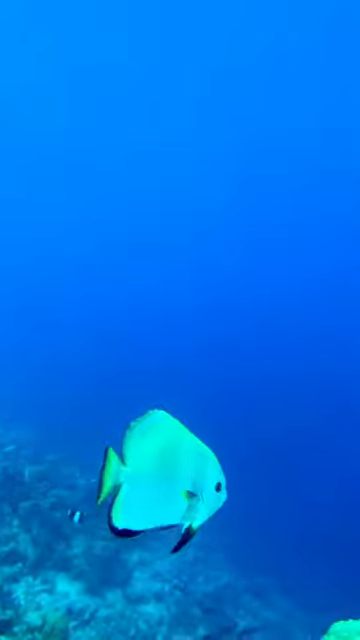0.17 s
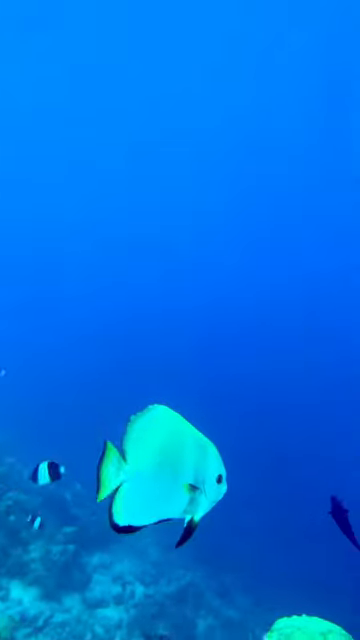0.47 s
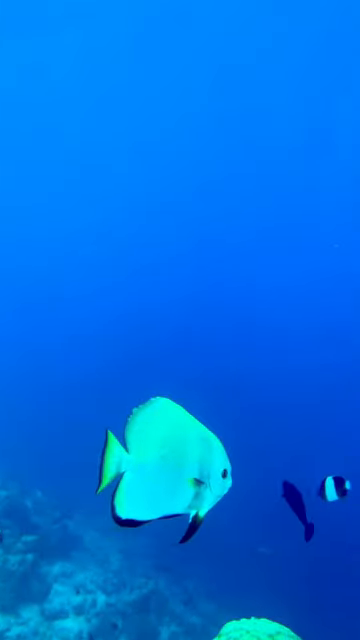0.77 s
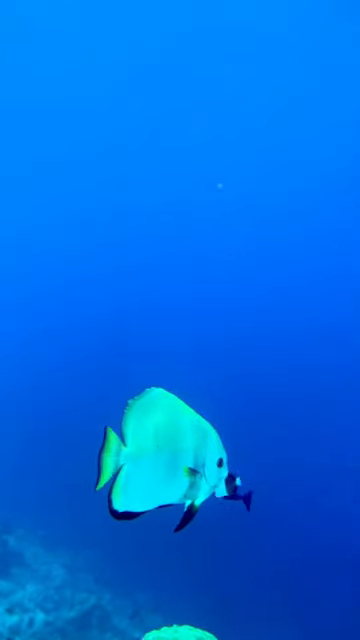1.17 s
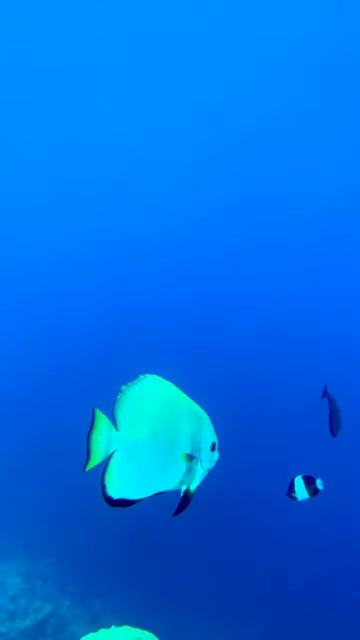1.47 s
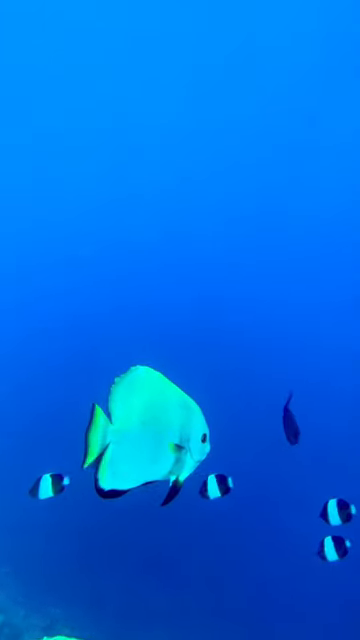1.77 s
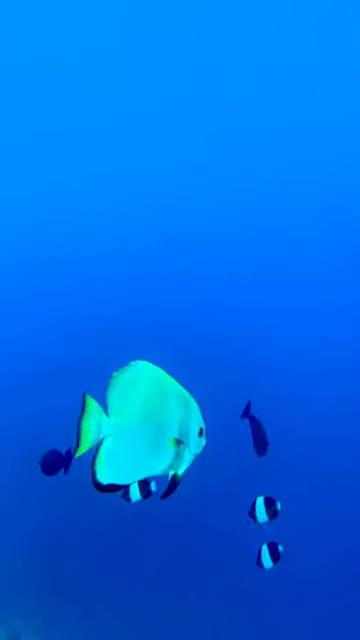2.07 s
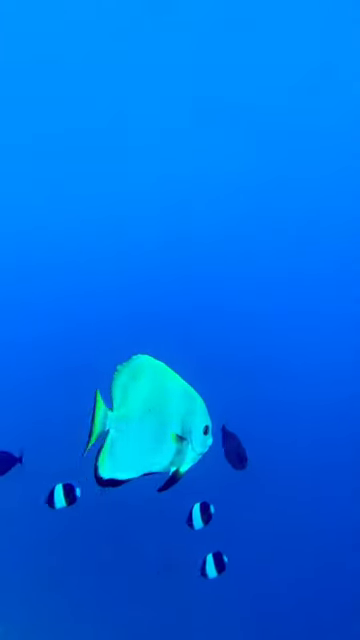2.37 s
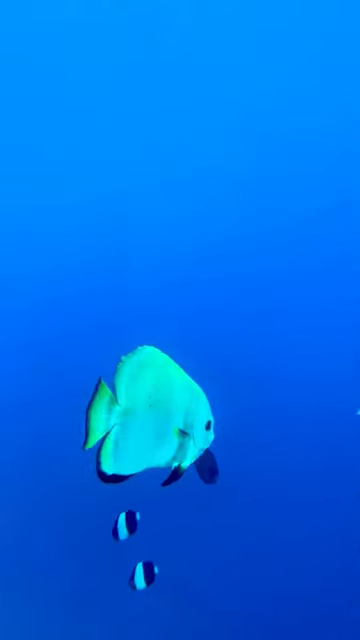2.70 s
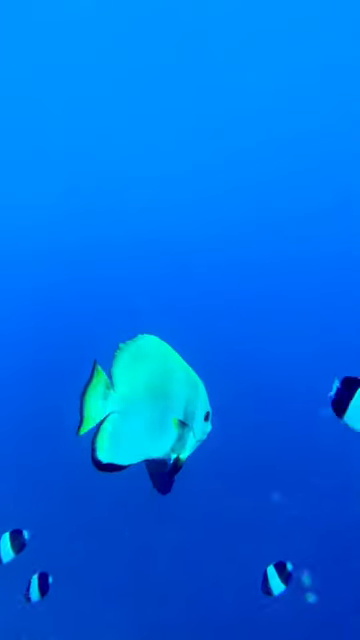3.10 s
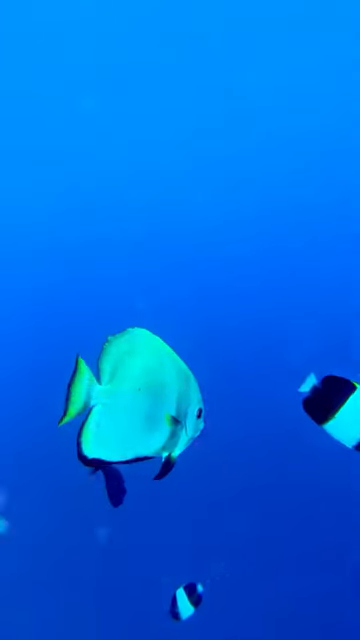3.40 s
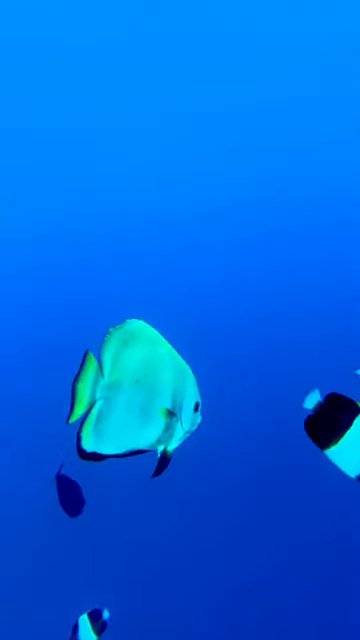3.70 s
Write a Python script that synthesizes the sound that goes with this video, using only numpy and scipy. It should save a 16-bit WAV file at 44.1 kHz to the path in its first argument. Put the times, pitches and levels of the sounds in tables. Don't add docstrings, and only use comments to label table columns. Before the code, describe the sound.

Low underwater bubbling, muffled and boxy inside a camera housing. Water churns and fizzes from the start; short gulps sagging in pitch gather around 0.8-1.1 s, with a strong burst at 1.3 s. A calmer stretch follows from 1.6 to 2 s, then gulps, tiny pops and hollow knocks resume, hitting hard at 3.4 s. Dry shrimp snaps crackle throughout, the farthest blending into faint hiss.

```python
import sys
import numpy as np
from scipy import signal
from scipy.fft import rfft, irfft
from scipy.io import wavfile
from scipy.ndimage import uniform_filter1d

SR = 44100
rng = np.random.default_rng(int(sys.argv[2]) if len(sys.argv) > 2 else 0)


def dump_mix(stems):
    frames = np.atleast_2d(stems).T
    limited = np.clip(frames, -1, 1)
    pcm = np.round(limited * 32767).astype(np.int16)
    wavfile.write(sys.argv[1], SR, pcm)


def rack_gain(trim_db):
    fader = np.asarray(trim_db, float)
    return 10 ** (fader / 20)


N = 169785


# peak_s [s] (time of the bubble's peak), peak_db [dB], pitch_hz [Hz], length_ms [ms]
BIG_BUBBLES = [(0.097, -29, 247.2, 15), (0.2986, -27.5, 227, 10.5), (0.4755, -28, 254, 10.43),
               (0.606, -28, 265, 6.5), (0.67, -25.5, 252.4, 14), (0.8192, -22, 231.6, 11),
               (0.903, -22, 224, 6), (0.912, -18, 177.2, 15), (0.938, -24.5, 186, 11.7),
               (0.9746, -24, 207, 11.5), (1.0369, -25, 168, 17), (1.1127, -25, 198, 17.5),
               (1.2868, -12.5, 243.4, 8), (1.2993, -11.5, 207.5, 11.4), (1.314, -19.5, 233, 7),
               (1.329, -27, 189, 7), (1.3705, -23, 183, 7.6), (1.3963, -23.5, 240, 6.7),
               (1.4514, -20, 190.4, 8.5), (2.0667, -29, 209.6, 7.7), (2.3094, -25, 191.2, 21),
               (2.3773, -19, 238.7, 14), (2.42, -21, 206.6, 5.77), (2.5995, -20.5, 236.4, 13.5),
               (2.782, -27.5, 178, 9.9), (2.9368, -30, 205, 18.4), (2.962, -28.5, 267, 24),
               (3.017, -18, 168, 7.6), (3.059, -23.5, 202, 6.5), (3.0907, -26.5, 186, 7.5),
               (3.2171, -27, 203.5, 11.3), (3.246, -30, 197, 8), (3.359, -28.5, 183, 9.2),
               (3.4071, -12, 195.8, 8.6), (3.4164, -19, 149.6, 6.93), (3.444, -26.5, 237, 11),
               (3.5509, -27.5, 255, 16)]


def gulps():
    throbs = bubbles(BIG_BUBBLES, sag_octaves=0.603)

    heaves = []
    for start_s, peak_db, pitch_hz, _ in BIG_BUBBLES:
        heave_db = peak_db - 10.5 - 12 * np.log2(pitch_hz / 200)
        heaves.append((start_s + 0.0106, heave_db, 0.52 * pitch_hz, 23))

    shake = np.abs(uniform_filter1d(np.abs(throbs), 260)) ** 0.87
    froth = coloured(shake * rng.standard_normal(N), 249, 930)
    froth_level = np.std(throbs) * rack_gain(-11.5)
    return throbs + bubbles(heaves, sag_octaves=0.315) + froth * froth_level


# peak_s [s] (time of the bubble's peak),
# peak_db [dB], pitch_hz [Hz], length_ms [ms]
SMALL_BUBBLES = [(0.2953, -31, 640, 6.7), (0.3872, -28.5, 626, 9.3), (0.4179, -34, 661.0, 8.4),
                 (0.503, -50, 1200, 6.8), (0.5308, -35.5, 719, 6.9), (0.5893, -31, 724, 7.7),
                 (0.9181, -33.5, 604, 17), (0.955, -38, 871, 10.3), (0.9557, -33.5, 620, 16),
                 (1.1739, -35.5, 644, 12.2), (1.2813, -35, 656, 4.6), (1.294, -31.5, 580, 4.6),
                 (1.361, -40, 640, 5.7), (1.445, -34, 606, 4), (1.5163, -32, 705, 3.4),
                 (2.291, -41, 802, 12), (2.385, -38, 711, 23), (2.4042, -32.5, 776, 5),
                 (2.595, -44, 683, 5), (2.9959, -35.5, 805, 3.2), (3.0112, -29.5, 652, 3.1),
                 (3.4, -36.5, 579, 9.7), (3.5426, -29.5, 733, 2.5), ]


def pops():
    return bubbles(SMALL_BUBBLES, sag_octaves=0.059)


# peak_s [s] (time of the hum's peak), peak_db [dB], length_ms [ms]
KNOCKS = [(0.6567, -36, 24), (1.1721, -31, 17.2), (1.2836, -26.5, 9), (1.3957, -31, 15.2),
          (1.4499, -32, 13.7), (1.517, -35, 15), (1.6494, -29, 17), (2.3772, -29, 39.52), (2.5884, -29, 61),
          (2.712, -33.5, 18), (2.938, -28, 15), (3.1948, -32, 46), (3.2807, -35.5, 20.0),
          (3.4056, -19.5, 14), (3.4505, -30.5, 25), (3.531, -26.5, 20.1), (3.727, -35, 32)]


def housing_hum():
    hums = []
    for (start_s, peak_db, length_ms), chance in zip(KNOCKS, rng.random(len(KNOCKS))):
        pitch_hz = 423 * (1 - 0.0584 * chance)
        hums.append((start_s, peak_db, pitch_hz, length_ms))
    return bubbles(hums, sag_octaves=0.0626)


# mid_s [s] (time of the snap's middle; it begins half a length earlier), peak_db [dB],
# centre_hz [Hz], length_ms [ms]
NEAR_SNAPS = [
    (0.2202, -29, 5950, 4.3),
    (0.7296, -28.5, 3340, 4.2),
    (0.8488, -25, 9500, 3.4),
    (0.8775, -32, 3800, 4.6),
    (1.3785, -25.5, 3600, 2.85),
    (2.1276, -31.5, 3030, 3.4),
    (2.9146, -33.5, 3900, 4),
    (3.752, -36.5, 2700, 5.7),
]


def near_shrimp():
    return snaps(NEAR_SNAPS, body_octaves=2.7, thud_db=6.0)


# mid_s [s] (time of the
# snap's middle; it begins half a length earlier), peak_db [dB], centre_hz [Hz]
FARTHER_SNAPS = [(0.196, -32.5, 4100), (0.313, -37, 4830), (0.362, -39, 1500), (0.445, -37, 6440),
                 (0.4683, -41.5, 4230), (0.5552, -40.6, 4060), (0.641, -39, 3530), (0.913, -40.5, 6330),
                 (1.1617, -41, 9500), (1.2231, -40.5, 4960), (1.4818, -40, 4850), (1.516, -36.5, 1530),
                 (1.555, -40.5, 3249.0), (2.2159, -35, 3170), (2.2786, -38.5, 4135.0), (2.437, -34.5, 3130),
                 (2.483, -39, 3220), (2.5488, -41.5, 4300), (2.6569, -42, 3280), (2.6696, -37.5, 3433.0),
                 (2.6979, -32, 2980), (2.7331, -36.5, 4900), (2.8358, -38.5, 7000), (2.84, -43, 3723.0),
                 (3.362, -42.5, 4356.0), (3.446, -39.5, 8460), (3.5265, -40.5, 3894.0),
                 (3.558, -40.5, 3593.0), (3.652, -40, 7000), (3.6968, -36.5, 3900),
                 (0.0794, -41.5, 3240), (0.2644, -45.5, 5720), (0.2737, -48, 10130), (0.2866, -45.0, 4310),
               (0.3496, -41.5, 4480), (0.4031, -44.5, 6220), (0.5007, -43, 4020), (0.5373, -42, 4360),
               (0.6317, -46, 7660), (0.653, -46, 7340), (0.776, -47, 6410), (0.8595, -45.0, 5240),
               (0.993, -43, 8400), (1.1194, -45, 8430), (1.2, -47, 9230), (1.3275, -48.0, 9400),
               (1.4264, -41.5, 4630), (1.4438, -48, 6000), (1.4497, -43.5, 5570), (1.497, -51, 8240),
               (1.5016, -45.5, 5630), (1.5272, -45, 6250), (1.5648, -41.5, 7760), (1.7968, -49.0, 7430),
               (1.8179, -51, 6650), (1.8711, -46.5, 6600), (1.949, -45.5, 5130), (1.9898, -47, 7450),
               (2.0274, -50.5, 8940), (2.2925, -48, 8080), (2.3567, -46, 5200), (2.572, -47, 7150),
               (2.85, -48, 10320), (2.929, -47, 8110), (2.9661, -41.5, 6170), (2.973, -45, 8450),
               (3.0744, -45.0, 5240), (3.089, -42.5, 3740), (3.1314, -50.0, 10380), (3.1553, -43, 9470),
               (3.238, -47.5, 9290), (3.3336, -48.5, 10260), (3.3821, -53, 3900), (3.396, -47, 12240),
               (3.4213, -42.5, 6880), (3.434, -47.5, 8710), (3.476, -43.5, 5840), (3.5028, -46.5, 4940),
               (3.5401, -58, 6030), (3.5469, -51, 10790), (3.6836, -38, 2750), (3.7798, -44, 5710)]


def farther_shrimp():
    rows = [(*row, 2.398) for row in FARTHER_SNAPS]
    return snaps(rows, body_octaves=1.74)


def tumbling(swirl_db):
    out = np.zeros(N)
    # low edge (Hz), high edge (Hz), level (dB), dB gained per dB of swirl
    sizes = (
        (38, 62, -10.0, 1.39),
        (106, 370, -1.76, 0.74),
        (348, 640, -2.0, -1.1),
        (524, 1900, -15.0, 1.17),
    )
    for lo_hz, hi_hz, level_db, swirl_share in sizes:
        grain_ms = 1000 * 1.26 / hi_hz
        grains_per_s = 300 * np.sqrt(hi_hz / 500)
        grains = patter(grains_per_s, 1.5, grain_ms)
        wobble_db = 2.35 * min(hi_hz / 600, 1) * walk(7.17)
        layer = coloured(grains * rack_gain(wobble_db), lo_hz, hi_hz)
        out += layer * rack_gain(level_db + swirl_share * swirl_db)
    return out


def fizz(swirl_db):
    chance = rng.random((260, 4))
    start_s = chance[:, 0] * N / SR
    lowest_hz = 516
    pitch_hz = lowest_hz * 2 ** (1.81 * chance[:, 1] ** 1.32)
    level_db = 2 - 7 * np.log2(pitch_hz / lowest_hz) - 12 * chance[:, 2]
    level_db += 0.35 * np.interp(start_s, np.arange(N) / SR, swirl_db)
    length_ms = 1000 * 5.6 * (0.5 + chance[:, 3]) / pitch_hz
    return bubbles(np.c_[start_s, level_db, pitch_hz, length_ms], sag_octaves=-0.078)


# start_s [s], level_db [dB]
CHURN_LEVEL = [
    (.04, -42),
    (.8, -40.5),
    (1.5, -40.5),
    (1.8, -41.5),
    (2.05, -43),
    (2.3, -40.5),
    (2.9, -38.5),
    (3.2, -39.5),
    (3.85, -39.5),
]


def churn():
    t = np.arange(N) / SR
    swirl_db = 9.5 * np.clip((0.807 - t) / 0.1, 0, 1)
    surge_db = np.interp(t, *np.transpose(CHURN_LEVEL)) - 2
    return (tumbling(swirl_db) + fizz(swirl_db)) * rack_gain(surge_db)


def reef():
    chance = rng.random((330, 4))
    start_s = chance[:, 0] * N / SR
    peak_db = -57 - 6 * np.log(chance[:, 1] + 0.2)
    centre_hz = 2600 * 2 ** (2.4 * chance[:, 2] ** 1.3)
    length_ms = 1.3 + 3 * chance[:, 3]
    far = snaps(np.c_[start_s, peak_db, centre_hz, length_ms], body_octaves=1.3)

    crowd = coloured(patter(510, 1, 8), 1320, 13500)
    hiss = coloured(rng.standard_normal(N), 1640, 34000)
    crowd_level = rack_gain(-61.5 + walk(1.65))
    hiss_level = rack_gain(-65 + 1.2 * walk(24.9))
    return far + crowd_level * crowd + hiss_level * hiss


def bubbles(rows, sag_octaves):
    out = np.zeros(N)
    for (start_s, peak_db, pitch_hz, length_ms), phase in zip(rows, rng.random(len(rows))):
        n = length_ms * SR / 1000
        u = np.arange(-int(2 * n), int(4 * n)) / n
        rise = min(0.41, 3.93 / length_ms)
        swell = np.exp(-0.5 * (u / rise) ** 2)
        fade = 1 / np.cosh(u / 0.63 * 2)
        envelope = np.where(u < 0, swell, fade)
        hz = pitch_hz * 2 ** (-sag_octaves * np.clip(u, -2, 2))
        throb = np.sin(2 * np.pi * (phase + np.cumsum(hz) / SR))
        add(out, int(start_s * SR - 2 * n), rack_gain(peak_db) * envelope * throb)
    return out


def snaps(rows, body_octaves, thud_db=0):
    out = np.zeros(N)
    size = 2048
    hz = np.arange(size // 2 + 1) * SR / size + 1
    t_ms = np.arange(size) * 1000 / SR - 5
    late_ms = np.clip(t_ms, 0, None)
    housing = rack_gain(colour_db(hz) - table(hz, WATER_TONE))
    thud = rack_gain(thud_db / (1 + np.log2(hz / 1000) ** 4))
    high = 1 / (1 + (6300 / hz) ** 2)
    dull = 1 / (1 + (hz / 5000) ** 2)

    for (start_s, peak_db, centre_hz, length_ms), noise in zip(rows, rng.standard_normal((len(rows), size))):
        octaves = np.log2(hz / centre_hz)
        spread = np.where(octaves < 0, body_octaves, 0.89)
        tint = causal(housing * thud * rack_gain(-6 * (octaves / spread) ** 2))

        u = late_ms / length_ms
        burst = rfft(noise * np.minimum((u * 1.39) ** 2, 1) * np.exp(-u ** 2 * 1.2))
        crack = rfft(noise * (t_ms > 0) * np.exp(-u / 0.29))
        echo = dull * rfft(noise * np.minimum(u, 1) * np.exp(-late_ms / 10.2))
        snap = irfft(((1 - high) * burst + 1.4 * high * crack + rack_gain(-13) * echo) * tint)

        loudest = np.sqrt(uniform_filter1d(snap ** 2, 60).max())
        at = int((start_s - length_ms / 2000 - 0.005) * SR)
        add(out, at, snap * rack_gain(peak_db - 3) / loudest)
    return out


def patter(rate_per_s, scatter_db, length_ms):
    chance = rng.random((4000, 2))
    at = (np.cumsum(-np.log(chance[:, 0])) / rate_per_s * SR).astype(int)
    inside = at < N
    hits = np.zeros(N)
    np.add.at(hits, at[inside], rack_gain(-2 * scatter_db * np.log(chance[inside, 1] + 0.03)))
    u = np.arange(int(6 * length_ms * SR / 1000)) * 2000 / SR / length_ms
    swell = u ** 0.5 * np.exp(-u)
    power = np.abs(signal.fftconvolve(hits, swell)[:N])
    return rng.standard_normal(N) * np.sqrt(power / power.mean())


# pitch_hz [Hz], level_db [dB per Hz]
WATER_TONE = [
    (28, -31.5),
    (55, -4),
    (200, -4),
    (700, -17.5),
    (1200, -30.5),
    (2200, -39),
    (8000, -47.5),
    (16000, -54.5),
]
# pitch_hz [Hz], width_hz [Hz], boost_db [dB]
HOUSING_PEAKS = [(290.3, 53, 9.5), (337.5, 34, -14.5), (399.5, 74, 9.5), (514, 42, -12), (2160, 320, -4),
                 (3200, 350, 7.5), (3840, 1130, 8.5), (4360, 87, -7), (5140, 280, 6), (7240, 490, 8.5),
                 (8470, 590, -7.5), (13600, 6900, 8)]


def colour_db(hz):
    level_db = table(hz, WATER_TONE)
    for pitch_hz, width_hz, boost_db in HOUSING_PEAKS:
        level_db = level_db + boost_db / (1 + (2 * (hz - pitch_hz) / width_hz) ** 2)
    return level_db


def coloured(x, lo_hz, hi_hz):
    size = 8192
    hz = np.arange(size // 2 + 1) * SR / size
    lows = 1 + (lo_hz / (hz + 1)) ** 4
    highs = 1 + (hz / hi_hz) ** 4
    gain = rack_gain(colour_db(hz)) / np.sqrt(lows * highs)
    ringing = irfft(causal(gain))[:size // 2]
    y = signal.fftconvolve(x, ringing)[:N]
    return y / np.std(y)


def causal(gain):
    c = irfft(np.log(gain + 1e-9))
    half = len(c) // 2
    c[1:half] *= 2
    c[half + 1:] = 0
    return np.exp(rfft(c))


def table(hz, points):
    points = np.array(points, float)
    return np.interp(np.log(hz + 1), np.log(points[:, 0]), points[:, 1])


def walk(rate_hz):
    k = int(SR / rate_hz)
    drift = np.repeat(rng.standard_normal(N // k + 1), k)
    drift = uniform_filter1d(uniform_filter1d(drift, k), k)[:N]
    return drift / np.std(drift)


def add(out, at, piece):
    first = max(at, 0)
    out[first:at + len(piece)] += piece[first - at:N - at]


def scene():
    air = gulps() + pops() + housing_hum()
    shrimp = near_shrimp() + farther_shrimp()
    return (air + shrimp + churn() + reef())[None]


def low_pass(x):
    return signal.sosfilt(signal.butter(12, 16820, fs=SR, output="sos"), x)


def record(dry):
    fade_in = np.clip((np.arange(N) / SR - 0.036) / 0.0007, 0, 1)
    no_top = signal.cheby1(8, 1, 15750, fs=SR, output="sos")
    no_bass = signal.butter(2, 36, "high", fs=SR, output="sos")
    cut = signal.sosfilt(no_bass, signal.sosfilt(no_top, dry))
    return low_pass(cut * fade_in)


dry = scene()
out = record(dry)
dump_mix(out)
```